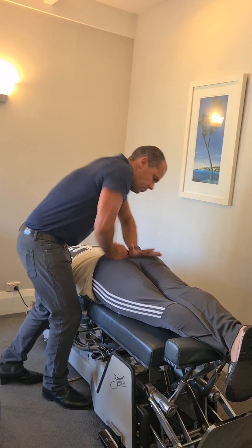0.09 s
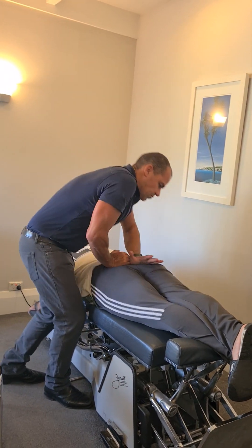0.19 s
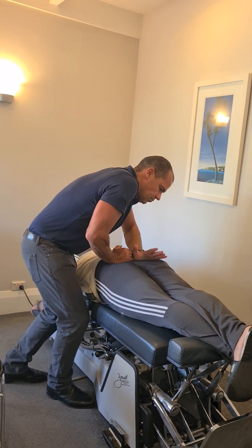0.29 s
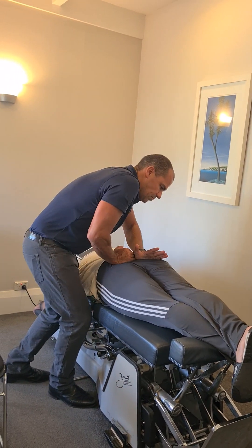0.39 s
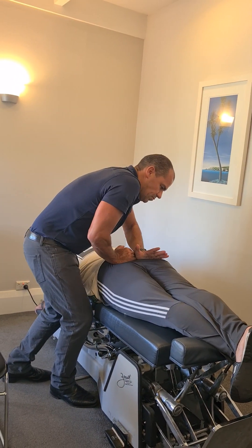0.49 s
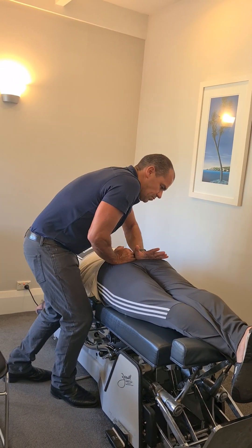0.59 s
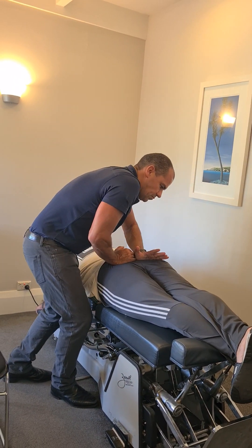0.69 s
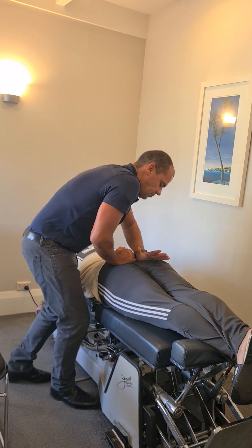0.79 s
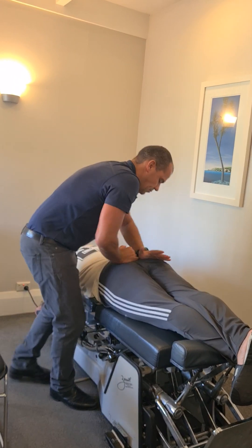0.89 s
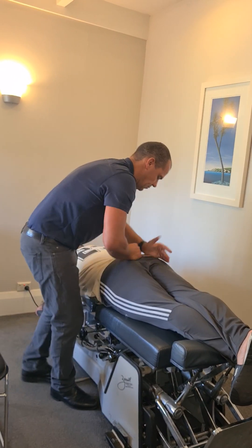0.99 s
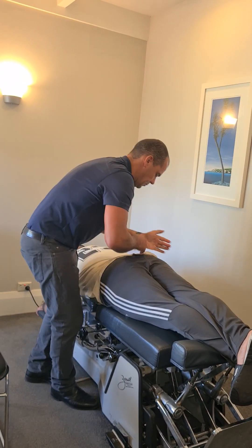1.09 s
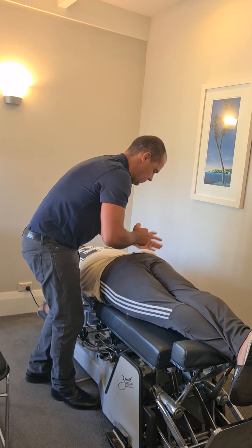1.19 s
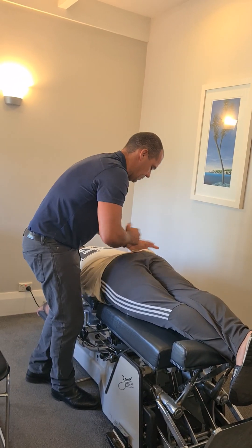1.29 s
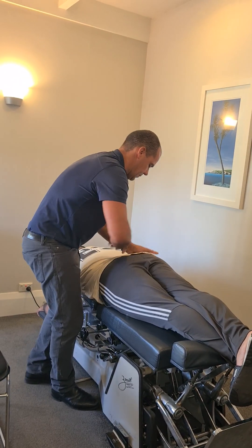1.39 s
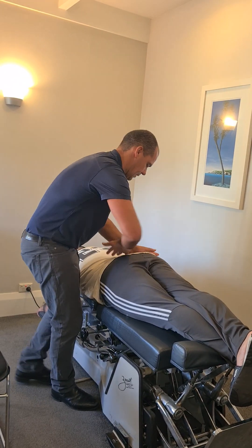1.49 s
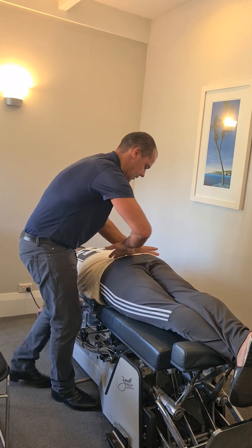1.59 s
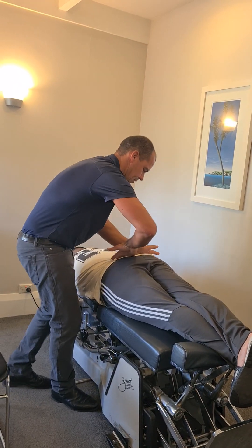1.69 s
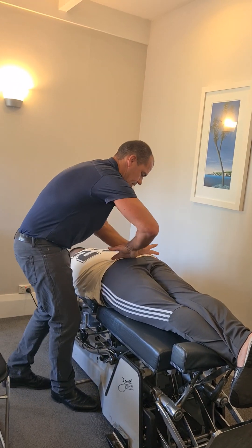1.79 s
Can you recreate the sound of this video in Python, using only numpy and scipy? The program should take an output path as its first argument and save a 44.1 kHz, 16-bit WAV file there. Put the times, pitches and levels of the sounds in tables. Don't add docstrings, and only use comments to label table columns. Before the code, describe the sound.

A padded treatment table section drops with a hard, rattling clack and low thump, then about a second later knocks back up with a puff and a fading air hiss, close in a small quiet room.

```python
import sys
import numpy as np
from scipy import signal
from scipy.fft import rfft, irfft
from scipy.io import wavfile
from scipy.ndimage import uniform_filter1d

SR = 44100
rng = np.random.default_rng(int(sys.argv[2]) if len(sys.argv) > 2 else 0)


def gain_from_decibels(decibels):
    exponent = np.asarray(decibels, float) / 20
    return 10 ** exponent


def persist_wave(psi):
    counts = np.round(np.clip(psi, -1, 1) * 32767).astype(np.int16)
    wavfile.write(sys.argv[1], SR, np.atleast_2d(counts).T)


N = 79380
T = np.arange(N) / SR


def read(table, hz):
    table = np.array(table)
    return np.interp(np.log(hz + 1), np.log(table[:, 0]), table[:, 1])


def over_time(table):
    seconds, db = np.array(table).T
    return np.interp(T, seconds, db)


def colour(x, table):
    n = x.shape[-1]
    gain = gain_from_decibels(read(table, np.fft.rfftfreq(n, 1 / SR)))
    return irfft(rfft(x) * gain, n)


def noise(table):
    x = colour(rng.standard_normal(N), table)
    return x / x.std()


def band(x, hz, q):
    return signal.lfilter(*signal.iirpeak(min(hz, 0.45 * SR), q, fs=SR), x)


def walk(rate_hz):
    k = int(SR / rate_hz)
    steps = np.repeat(rng.standard_normal(N // k + 1), k)
    return 1.3 * uniform_filter1d(uniform_filter1d(steps, k), k)[:N]


def shape(start, attack, hold, t60):
    t = T - start
    rise = np.clip(t / attack, 0, 1) ** 2
    return rise * gain_from_decibels(-60 * np.clip(t - attack - hold, 0, None) / t60)


def stereo(mid, side):
    # frequency in Hz, side minus mid in dB
    side_balance = [(60, -14.5), (110, -22.5), (200, -14), (380, -9), (700, -4.5), (1290, 0.5),
                    (2380, -0.5), (4400, -1.5), (8120, 3), (15000, -3.5)]
    side = colour(side, side_balance)
    return np.array([mid + side, mid - side])


def blows():
    # start in seconds, level in dB, contact in ms, crack in dB, part of the frame struck in Hz
    impacts = [(0.2419, -0.5, 0.25, -23.5, 586), (.2500, -10.5, 0.13, 1.5, 1040),
               (0.2567, -7.5, 0.22, -18.5, 1200), (.2665, -10, 0.33, -8.5, 900),
               (.2770, -12.5, 0.61, -22.5, 500), (.2890, -4.5, .8, -20, 400),
               (1.2006, -11.5, 0.13, -11, 1600), (1.2060, -23, 0.11, -11.5, 1500),
               (1.213, -17, 0.97, -17, 286), (1.228, -16.5, 1.17, -20.5, 297),
               (1.2480, -15.5, 1.5, -24.5, 395), (1.2570, -13, 2.7, -9.5, 243),
               (1.282, -19.5, 1.14, -11, 240), (1.3010, -9.5, 1.16, -30, 464),
               (1.3140, -11.5, 1.05, -31, 520), (1.3300, -16.5, 1.02, -36, 463),
               (1.3450, -17, 1.5, -30.5, 300), (1.4840, -25, 0.76, -19.5, 450),
               (1.5300, -23, 1.77, -34, 186), (1.7760, -21, 1.13, -36.5, 520), (1.7890, -20, 1.1, -34, 480)]
    # frequency in Hz, level in dB, T60 in seconds
    frame_modes = [(135, -9, 0.34), (189, 2.5, 0.037), (258, -10, 0.097), (352, -9, 0.043),
                   (456, -21, 0.026), (520, -4.5, 0.052), (606, -1.5, 0.036), (680, -2.5, 0.042),
                   (833, -3, 0.015), (996, -1, .025), (1129, 1, 0.038), (1292, -6.5, .02), (1600, 4, 0.011),
                   (1970, 4, .012)]
    scatter_db, detune, spread_db_per_oct2 = 1.8, 0.02, 3.5
    crack_hz, crack_t60_s = 3204, 0.02
    rattle_hz, rattle_db, rattle_t60_s = 1500, 8, 0.049

    hz, mode_db, t60 = np.array(frame_modes).T
    t = np.arange(SR // 8) / SR
    column = t[:, None]
    sign = np.sign(hz - 300)
    out = np.zeros(N + SR)
    for start, level_db, contact_ms, crack_db, part_hz in impacts:
        level_chance, pitch_chance = rng.standard_normal((2, len(hz)))
        distance_db = spread_db_per_oct2 * np.log2(hz / part_hz) ** 2
        gain = sign * gain_from_decibels(mode_db + scatter_db * level_chance - distance_db)
        tones = np.sin(2 * np.pi * hz * (1 + detune * pitch_chance) * column)
        ring = (gain * gain_from_decibels(-60 * column / t60) * tones).sum(axis=1)
        push = np.sin(np.pi * np.clip(t[:300] * 1000 / contact_ms, 0, 1))
        ring = -np.convolve(ring, push / push.sum())[:len(t)] / 3
        crack = band(rng.standard_normal(len(t)), crack_hz, 1.0)
        crack = crack * gain_from_decibels(crack_db - 60 * t / crack_t60_s)
        rattle = band(rng.standard_normal(len(t)), rattle_hz, 1.69)
        rattle = rattle * gain_from_decibels(crack_db + rattle_db - 60 * t / rattle_t60_s)
        i = int(start * SR)
        out[i:i + len(t)] += gain_from_decibels(level_db) * (ring + crack + rattle)
    return out[:N]


def slides():
    # start in seconds, length in seconds, final level in dB, growth in dB
    scrapes = [
        (0.208, 0.023, -31.5, 19),
        (1.171, 0.027, -31, 33),
    ]
    # frequency in Hz, level in dB per Hz
    scrape_colour = [(59, -36), (100, 9), (1010, -17), (1310, -7.5), (1800, -11), (5530, -17), (16000, -37)]
    gain = np.zeros(N)
    for start, length, final_db, growth_db in scrapes:
        sliding = (T > start) & (T < start + length)
        remaining = np.clip(1 - (T - start) / length, 0, 1)
        gain += sliding * gain_from_decibels(final_db - growth_db * remaining)
    return gain * noise(scrape_colour) * gain_from_decibels(3 * walk(300))


def air():
    # start, attack, hold and T60 in seconds, level in dB
    puffs = [
        (0.239, 0.0055, 0.005, 0.28, -23),
        (1.179, 0.018, 0.0046, 0.039, -39.5),
        (1.2535, 0.00307, 0.024, 0.21, -33),
    ]
    vent = (1.482, .011, .06, .5, -30.5)
    # frequency in Hz, level in dB per Hz
    puff_colour = [(900, -24.5), (2000, -9), (4500, -6.5), (7000, -18.5), (8900, -8.5), (11000, -18.5),
                   (14500, -10), (16000, -6.5)]
    vent_colour = [(400, -19), (900, -8.5), (2500, -5.5), (6000, -4), (8500, -8), (10500, -8.5),
                   (13500, -0.5), (16000, -4.5)]
    hiss_colour = [(410, -39), (700, -37), (934, -26), (1680, -8), (2660, -10), (4430, 3), (10300, -26.5),
                   (14000, -4.5), (16000, -20.5)]

    puff_gain = sum(gain_from_decibels(db) * shape(*times) for *times, db in puffs)
    *vent_times, vent_db = vent
    rush = gain_from_decibels(vent_db) * shape(*vent_times) * noise(vent_colour)
    hiss = gain_from_decibels(-42) * shape(vent_times[0], 0.011, 0.13, 3.6) * noise(hiss_colour)
    return (puff_gain * noise(puff_colour) + rush + hiss) * gain_from_decibels(0.93 * walk(56))


def booms():
    # start in seconds, attack in seconds, level in dB, frequency in Hz, T60 in seconds
    loads = [(.25, .06, -37.5, 43.6, .35), (0.253, 0.038, -17, 135, 0.38), (.3, 0.01, -28.5, 258, 0.43),
             (0.379, 0.043, -31, 187.4, 0.2), (1.191, 0.027, -33, 46, 0.57),
             (1.221, .025, -23, 123.8, 0.17), (1.258, 0.018, -24, 245.2, .2),
             (1.291, 0.035, -27, 43.4, 0.43), (1.331, 0.0088, -29, 137.5, 0.31),
             (1.499, .06, -30, 43, 0.27), (1.51, 0.014, -38.5, 197, 0.17), (1.729, 0.0073, -42, 43, 0.87)]
    out = np.zeros(N)
    for start, attack, db, hz, t60 in loads:
        tone = np.sqrt(2) * np.sin(2 * np.pi * hz * (T - start))
        out += gain_from_decibels(db + 2.2 * walk(30)) * shape(start, attack, 0, t60) * tone
    return out


def room():
    # frequency in Hz, T60 in seconds
    room_decay = [(100, 0.48), (500, 0.39), (2000, 0.33), (5000, .31), (14000, 0.19)]
    build_s = 0.001
    t = np.arange(SR // 2) / SR
    tail = np.zeros((2, len(t)))
    for hz in 60 * 2 ** np.arange(0, 8.3, 0.5):
        tail += band(rng.standard_normal((2, len(t))), hz, 2.76) * gain_from_decibels(-60 * t / read(room_decay, hz))
    tail = tail * (1 - np.exp(-t / build_s))
    mid, side = tail / np.sqrt((tail ** 2).sum(axis=1, keepdims=True))
    return stereo(mid, side)


def hush():
    # frequency in Hz, level in dB per Hz
    hush_colour = [(60, -16.5), (100, 5), (250, -4.5), (500, -13.5), (1000, -15), (3200, -36), (5000, -48),
                   (16000, -75)]
    # time in seconds, level in dB
    hush_level = [(0, -49), (.55, -46.5), (.8, -52), (1.15, -51), (1.8, -47.5)]
    white = rng.standard_normal((2, N))
    out = np.zeros((2, N))
    for hz in 80 * 2 ** np.arange(0, 7.6, 0.5):
        out += band(white, hz, 3) * gain_from_decibels(1.5 * walk(6))
    out = colour(out, hush_colour)
    return out * gain_from_decibels(over_time(hush_level)) / out[0].std()


def rumble():
    # time in seconds, level in dB
    rumble_level = [(0.0, -61), (0.032, -45), (0.198, -45.5), (0.318, -27), (0.498, -46), (0.85, -40),
                    (1.134, -56.5), (1.17, -44)]
    centre_hz, width_hz = 47, 27.5
    out = rng.standard_normal(N)
    for _ in range(3):
        out = band(out, centre_hz, centre_hz / width_hz)
    out = out / np.sqrt(uniform_filter1d(out ** 2, SR // 16))
    return out * gain_from_decibels(over_time(rumble_level))


def hum():
    # frequency in Hz, level in dB
    motor_tones = [(98, -65), (180, -61.5), (242, -54.5), (540, -68), (600, -64.5)]
    return sum(gain_from_decibels(db + 2.8 * walk(15.9)) * np.sin(2 * np.pi * hz * T) for hz, db in motor_tones)


def cloth():
    # frequency in Hz, level in dB per Hz
    cloth_colour = [(160, -34.5), (280, -9.5), (393, -3), (457, -21.5), (653, -7.5), (1180, -19.5),
                    (1330, -15), (16000, -48.5)]
    # time in seconds, level in dB
    cloth_level = [(0, -54), (.08, -57.5), (.13, -52.5), (.21, -52.5), (.3, -94.5)]
    out = colour(rng.standard_normal((2, N)), cloth_colour)
    return out / out.std() * gain_from_decibels(over_time(cloth_level) + 0.8 * walk(40))


def background():
    wide = hush() + cloth()
    return stereo(wide[0] + rumble() + hum(), wide[1])


def scene():
    lag_s, frame_room_db, air_room_db = 0.00012, 2.5, -2.5
    frame = blows() + slides()
    gas = air()
    lags = lag_s * np.array([[1], [0]])
    delay = np.exp(-2j * np.pi * np.fft.rfftfreq(N, 1 / SR) * lags)
    direct = irfft(rfft(frame + gas) * delay, N)
    send = gain_from_decibels(frame_room_db) * frame + gain_from_decibels(air_room_db) * gas
    wet = signal.fftconvolve(send[None], room(), axes=1)[:, :N]
    return direct + wet + booms() + background()


def band_limit(x):
    return signal.sosfilt(signal.butter(12, 16520, fs=SR, output="sos"), x)


def record(dry):
    headroom, top_hz = 1.05, 15900
    rounded = np.tanh(dry / headroom) * headroom
    low_pass = signal.ellip(8, 0.2, 70, top_hz, fs=SR, output="sos")
    return band_limit(signal.sosfilt(low_pass, rounded))


dry = scene()
out = record(dry)
persist_wave(out)
```